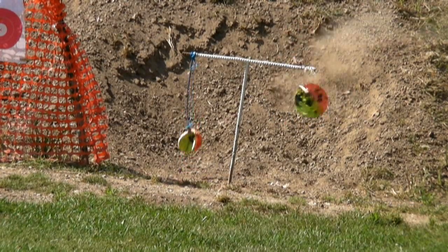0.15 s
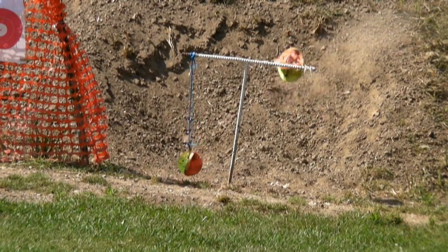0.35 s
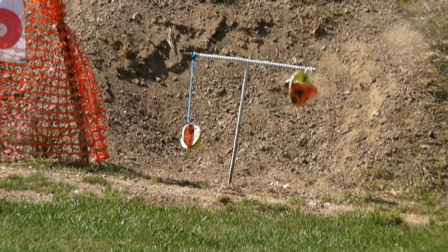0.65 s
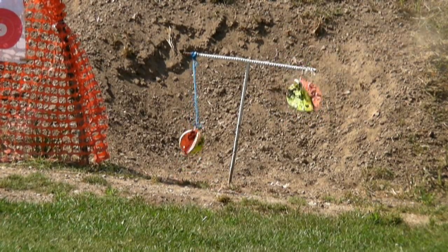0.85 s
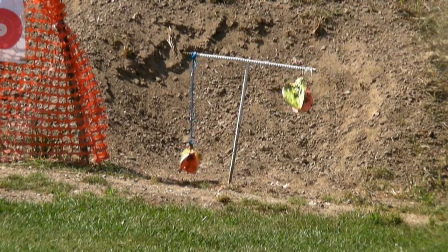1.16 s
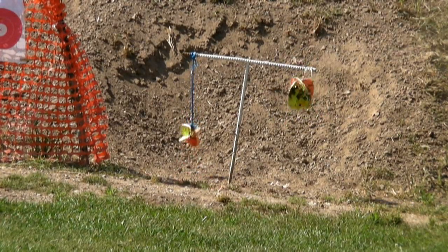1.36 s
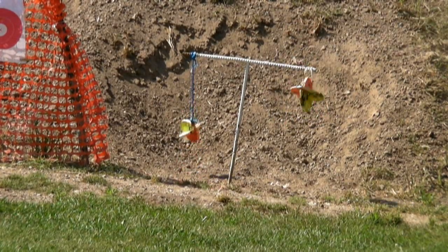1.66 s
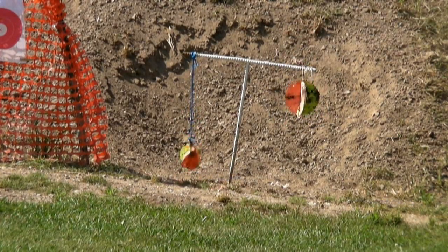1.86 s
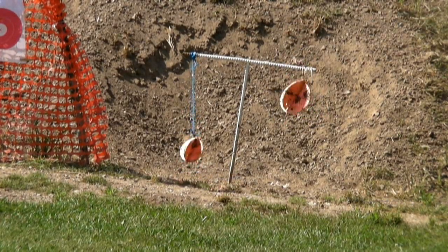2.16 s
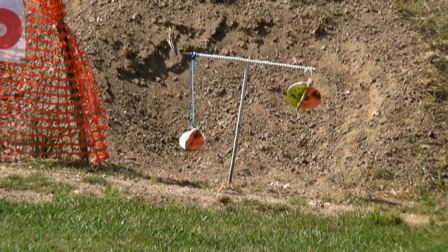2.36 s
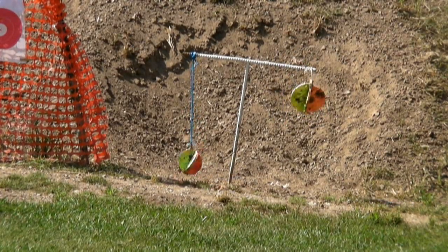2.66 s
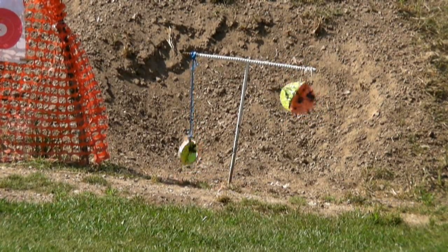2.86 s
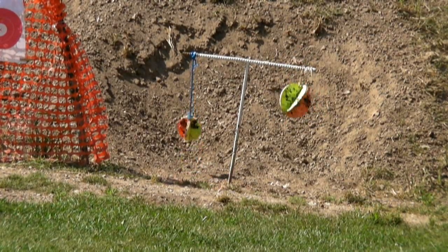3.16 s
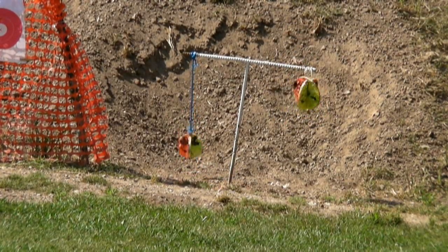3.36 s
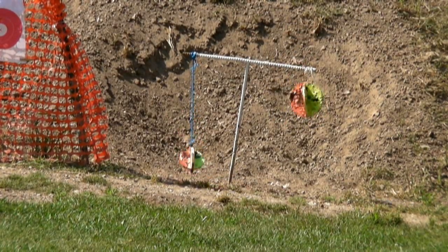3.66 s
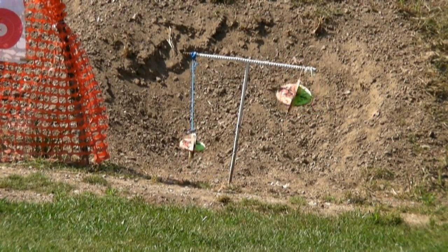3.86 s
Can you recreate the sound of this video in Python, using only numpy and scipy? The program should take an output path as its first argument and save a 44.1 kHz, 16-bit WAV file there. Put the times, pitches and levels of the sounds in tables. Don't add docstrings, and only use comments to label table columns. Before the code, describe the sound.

A rifle shot's grainy, hollow echo fades over the first half second outdoors. From 0.5 to 0.9 seconds a close steel lever clacks, grinds and rings open and shut, locking hard at 1.0. A brass case drops on the bench at 1.3, bounces, then faint knocks follow. Wind, distant traffic hum and fast high insect chirring slowly rise until a clipped, booming shot at 3.9.

```python
import sys
import numpy as np
from scipy import signal
from scipy.fft import rfft, irfft
from scipy.io import wavfile

SR = 44100
rng = np.random.default_rng(int(sys.argv[2]) if len(sys.argv) > 2 else 0)


def pcm_store(signal):
    levels = np.round(np.clip(np.atleast_2d(signal), -1, 1) * 32767)
    wavfile.write(sys.argv[1], SR, levels.astype(np.int16).T)


def voltage_ratio(level):
    return 10 ** (np.asarray(level, float) / 20)


N = 176400
SIDES = np.array([[1], [-1]])


def rms_one(x):
    return x / np.sqrt(np.mean(x ** 2) + 1e-20)


def in_time(rows):
    s, *columns = np.transpose(rows)
    return [np.interp(np.arange(N) / SR, s, c) for c in columns]


def at_hz(points, hz):
    points = np.array(points)
    return np.interp(np.log(hz), np.log(points[:, 0]), points[:, 1])


def drift(rate, size):
    r = np.exp(-80 * np.pi * rate / SR)
    white = rng.standard_normal(size // 40 + 2002)
    slow = signal.lfilter([1], [1, -2 * r, r * r], white)[2000:]
    return np.interp(np.arange(size) / 40, np.arange(len(slow)), rms_one(slow))


def bands(size, gain_db, width, wider_db=0.0, patchy_db=0.0, rate=20.0):
    out, together = 0, drift(rate / 3, size)
    edges = 24 * 2 ** np.arange(0, 9.6, .5)
    white = rng.standard_normal((2, 2, size + 4000))
    for k, (low, high) in enumerate(zip(edges, edges[1:])):
        sos = signal.butter(2, [low, high], "band", fs=SR, output="sos")
        mid, side = signal.sosfilt(sos, white[k % 2])[:, 4000:]
        hz = np.sqrt(low * high)
        side_gain = np.minimum(1, voltage_ratio(at_hz(width, hz) + wider_db))
        patches = patchy_db * (together + drift(rate, size))
        gain = voltage_ratio(gain_db(hz) + patches) / np.sqrt(1 + side_gain ** 2)
        out = out + gain * (mid + side_gain * side * SIDES)
    return out


# (frequency [Hz], side over mid [dB])
WIDE_IMAGE = [(60, -12.5), (150, -12), (500, -12), (1000, -14.5), (2000, -1.5), (8000, -11)]


def resonant_noise(hz, width_hz):
    sos = signal.butter(1, [hz - width_hz / 2, hz + width_hz / 2], "band", fs=SR, output="sos")
    mid, side = signal.sosfilt(np.vstack([sos, sos]), rng.standard_normal((2, N)))
    return rms_one(mid + voltage_ratio(at_hz(WIDE_IMAGE, hz)) * side * SIDES)


# (frequency [Hz], side over mid [dB])
NARROW_IMAGE = [(100, -22.5), (1000, -23.5), (4000, -14.5), (8000, -10.5), (12000, -1.5)]
# (time [s], level [dB], dulling by distance [0-1])
ECHO_RETURNS = [(0, -10.5, 0.67), (.022, -20.5, 0.13), (.072, -9.5, 0.4), (.1, -16, 0.31), (.18, -14, 0.56),
                (.3, -21, 0.59), (.5, -26, 0.7), (.95, -43.5, 0.67), (1.5, -59, 1)]
# (frequency [Hz], level [dB per Hz])
NEAR_COLOUR = [(50, -26.5), (380, -9), (900, -10.5), (1850, -0.5), (3300, -7.5), (4000, 2), (10400, -25),
               (15700, -56)]
FAR_COLOUR = [(29, -68), (50, -22), (269, -7), (469, 5.5), (596, -1), (672, 1), (758, 1.5), (1760, -8.5),
              (15700, -60.5)]


def echo():
    size = int(1.5 * SR)
    level_db, far = [c[:size] for c in in_time(ECHO_RETURNS)]
    late_db = -15 * np.exp(-(np.arange(size) / SR / 0.022) ** 2)

    def colour(hz):
        mix = (1 - far) * at_hz(NEAR_COLOUR, hz) + far * at_hz(FAR_COLOUR, hz)
        return mix + late_db * (hz < 1000)

    roar = voltage_ratio(level_db + 4) * rms_one(bands(size, colour, NARROW_IMAGE, patchy_db=0.87, rate=33.0))
    ridge_db, ridge_hz, ridge_width_hz = 0.5, 547, 114
    ridge = resonant_noise(ridge_hz, ridge_width_hz)[:, :size].mean(0)
    roar = roar + voltage_ratio(level_db + late_db + ridge_db) * np.clip(far, 0, 1) * ridge
    squashed = 1.14 * np.tanh(roar / 1.244)
    roar = signal.sosfilt(signal.butter(2, 7500, fs=SR, output="sos"), squashed)
    fade = np.minimum(1, np.arange(size)[::-1] / 4000)
    return np.pad(roar * fade, ((0, 0), (0, N - size)))


# (centre time [s], half width [s], level [dB])
HAND_SLIDES = [
    (.33, 0.01, -59),
    (0.366, 0.025, -34),
    (0.411, 0.0096, -50),
    (0.599, 0.033, -40),
    (3.5, 0.037, -50),
]


def hand():
    t = np.arange(N) / SR
    high_pass = signal.butter(2, 3000, "high", fs=SR, output="sos")
    rub = signal.sosfilt(high_pass, rng.standard_normal((2, N)))
    strokes = sum(voltage_ratio(db) * np.exp(-((t - s) / w) ** 2) for s, w, db in HAND_SLIDES)
    return rub * voltage_ratio(2 * drift(60.0, N)) * strokes


def blows(rows, spectrum, modes, t60, modes_db, rise, ring_t60, beat_hz=16.5, rattle_db=6):
    out, t = np.zeros((2, N + SR)), np.arange(SR // 3) / SR
    hz = np.maximum(np.arange(len(t) // 2 + 1) * SR / len(t), 20)
    mode_hz, mode_db, mode_t60 = np.transpose(modes)[:, :, None]
    mode_width = voltage_ratio(at_hz(NARROW_IMAGE, mode_hz))
    shake = drift(110, SR)
    for s, db, tilt, ring_hz, ring_db in rows:
        noise = rng.standard_normal((2, len(t)))
        chance = rng.standard_normal((2, len(modes), 1))
        rattle = rattle_db * np.array([np.roll(shake, int(c * SR))[:len(t)] for c in chance[0, :, 0]])

        shape = voltage_ratio(at_hz(spectrum, hz) + tilt * np.log2(np.maximum(hz, 500) / 3000))
        width = [np.ones_like(hz), voltage_ratio(at_hz(NARROW_IMAGE, hz))]
        mid, side = irfft(rfft(noise) * shape * width, len(t))
        crack = rms_one(mid + side * SIDES) * voltage_ratio(-60 * np.maximum(t - rise, 0) / t60 - 7.0)

        ring_level = voltage_ratio(ring_db + .5 * rattle[0] * (ring_hz < 6000) - 60 * t / ring_t60)
        ring_skew = SIDES * voltage_ratio(at_hz(NARROW_IMAGE, ring_hz))
        ring = ring_level * np.sin(2 * np.pi * ring_hz * t + ring_skew) * np.cos(np.pi * beat_hz * t)

        body = voltage_ratio(modes_db + mode_db + 2 * chance[0] + rattle - 60 * t / mode_t60)
        skew = SIDES[:, None] * mode_width * chance[1]
        body = np.sum(body * np.sin(2 * np.pi * mode_hz * t + skew), axis=1)
        i = int(s * SR)
        out[:, i:i + len(t)] += voltage_ratio(db) * (crack + ring + body) * np.minimum(1, t / rise)
    return out[:, :N]


# (time [s], peak level [dB], tilt [dB per octave], ring [Hz], ring level [dB])
OPENING_CLACKS = [
    (0.5063, -12.5, 6, 10320, 6.5),
    (0.579, -10.5, 3, 5860, -18.5),
    (0.6283, -5, -1, 4320, -11),
    (0.6384, -9, 5, 3970, -6.5),
    (0.6484, 5, -0.2, 4117, -18),
    (0.7465, -18, -1, 12300, -13),
]
SHUTTING_CLACKS = [
    (0.7904, -12.5, -2.1, 10370, -13),
    (0.825, -2.5, -0.3, 12370, -6),
    (0.8599, -11, -0.37, 3830, -17.5),
    (.8692, -5.5, 0.61, 6680, -19),
    (.8982, -0.5, 1.2, 11980, -22.5),
    (0.8804, 2, -0.15, 5650, -16),
]
STEEL_GRINDS = [
    (.514, -1.5, 0, 7550, -4),
    (.805, -10.5, -3, 12300, -10),
    (.829, -9.5, -1.5, 12470, 2.5),
    (.844, -10.5, 0, 4040, -11),
    (.872, -20, -8.5, 6680, -18.5),
    (.886, 0.5, 1.5, 5620, -19),
    (.815, -11, -5, 2300, -18),
    (.919, -39, 5, 3920, -19.5),
]
SPRING_TICKS = [(.501, -24, 1.5, 7950, -18), (.5065, -21, -3, 12900, 8), (.5766, -3, 5, 11600, -19),
                (.612, -34, 1, 12800, -9.5), (.6495, -10, -3, 15500, 6), (.652, -17, -4, 14100, 9),
                (.8055, -13, -1, 12100, -4), (.8788, -9, 10, 6890, -20.5), (1.3364, -22, 5, 8600, -11),
                (.8975, -12.5, 0.5, 11920, 6), (.5145, -21, 0, 10350, 14)]
LOCK_BLOWS = [
    (1.002, -16, 4, 4000, -6.5),
    (1.0068, 9, 1, 4183, -11),
]
# (frequency [Hz], level [dB])
STEEL_COLOUR = [(120, -36), (250, -34), (600, -11), (1960, -1), (4070, -3), (4900, -6.5), (6200, -4.5),
                (15700, -15.5)]
# (frequency [Hz], level [dB], T60 [s])
OPEN_MODES = [(128, -25, 0.022), (584, -9, 0.1), (635, -10, 0.15), (1185, -4.5, 0.14), (2970, 3, 0.08),
              (3700, -1, 0.025), (6400, -16, 0.13), (6672, -8.5, 0.13), (8600, -8, 0.13), (10100, -8, 0.14),
              (12500, -11.5, 0.19), (13200, -14.5, 0.21), (16000, 4.5, .12)]
CLOSED_MODES = [(125, -12.5, 0.047), (583, -9.5, 0.14), (641, -9.5, 0.11), (703, -9, 0.101),
                (2470, -9, .08), (2825, -8.5, 0.1), (3580, -0.5, 0.059), (3810, -5.5, 0.058),
                (6400, -12, 0.14), (6540, -11.5, 0.19), (9050, -8, 0.11), (12170, -16, .1),
                (13000, -16, .1), (15610, -5, 0.118)]


def lever():
    steel_t60, ring_t60, open_db, hit_rise = 0.05, 0.063, -35, 0.00076
    clacks = list(OPENING_CLACKS) + list(SHUTTING_CLACKS)
    out = blows(clacks, STEEL_COLOUR, OPEN_MODES, steel_t60, open_db, hit_rise, ring_t60)
    out = out + blows(STEEL_GRINDS, STEEL_COLOUR, OPEN_MODES, steel_t60, open_db, 0.0059, ring_t60)
    out = out + blows(SPRING_TICKS, STEEL_COLOUR, OPEN_MODES, 0.0065, open_db, 0.00032, 0.028, beat_hz=3.7)
    return out + blows(LOCK_BLOWS, STEEL_COLOUR, CLOSED_MODES, steel_t60, -15.5, hit_rise, 0.068,
                       rattle_db=4.5)


# (time [s], peak level [dB], tilt [dB per octave], ring [Hz], ring level [dB])
BRASS_BOUNCES = [
    (1.3366, -5.5, -1.9, 6740, -27.5),
    (1.415, -19, -3.5, 6675, -43),
    (1.4256, -13.5, -0.5, 6675, -47),
    (1.467, -24.5, -3, 6675, -45),
    (1.742, -35, -9, 6675, -44),
    (2.004, -28.5, 0, 6675, -56),
    (2.364, -39.5, 4, 6675, -44),
    (2.95, -50, -9, 6740, -47),
    (3.505, -35, 3, 6675, -47),
    (3.245, -41, -2, 6675, -45),
]
BRASS_TOUCHES = [
    (1.4249, -13, 2, 4100, -12),
    (1.4154, -23, 1.5, 3300, -10),
    (1.7435, -35, 2, 2100, -9),
    (2.0046, -29, 2, 2100, -5),
    (2.951, -36, 2.5, 2500, -10),
]
# (frequency [Hz], level [dB])
BENCH_COLOUR = [(90, -42), (200, -12.5), (700, -5), (1770, 1.5), (2900, -4), (3500, -13), (6200, -24),
                (14000, -35.5)]
# (frequency [Hz], level [dB], T60 [s])
CASE_MODES = [(403, -13.5, 0.1), (732, -6, 0.11), (1670, 4, 0.022), (2100, 2.5, 0.064), (2550, -8, 0.091),
              (1570, -14, 0.13), (1083, -6, 0.1)]


def spent_case():
    case_db = -17.5
    touches = blows(BRASS_TOUCHES, BENCH_COLOUR, CASE_MODES, 0.0065, case_db, 0.00032, .02)
    return touches + blows(BRASS_BOUNCES, BENCH_COLOUR, CASE_MODES, 0.059, case_db, 0.00076, 0.29, beat_hz=10.6)


# (frequency [Hz], T60 [s])
SHELTER_DECAY = [(300, 0.61), (2000, 0.29), (8000, 0.3), (15000, 0.26)]


def shelter(x):
    t = np.arange(SR // 2) / SR
    tail = bands(len(t), lambda hz: -60 * t / at_hz(SHELTER_DECAY, hz), NARROW_IMAGE, wider_db=1.0)
    tail = tail * np.minimum(1, t / 0.011)
    tail = tail / np.sqrt(np.sum(tail[0] ** 2))
    return voltage_ratio(-9.5) * signal.fftconvolve(x.mean(0)[None], tail, axes=1)[:, :N]


# (frequency [Hz], level [dB per Hz])
AIR_COLOUR = [(15, -37), (25, -4), (107, -3.5), (391, -15), (810, -15.5), (7010, -34), (8460, -35),
              (9680, -39.5), (15700, -53)]


def wind_and_traffic():
    return rms_one(bands(N, lambda hz: at_hz(AIR_COLOUR, hz), WIDE_IMAGE, patchy_db=1.42, rate=32.0))


def engine_drone():
    return voltage_ratio(-8 + 3.3 * drift(5.9, N)) * resonant_noise(111.5, 11)


def insect():
    since = np.arange(N) / SR - 3.301
    turn = (since * 17.45 + .25) % 1 - .25
    second = voltage_ratio(-5) * np.exp(-((turn - .42) / .09) ** 2)
    pulses = .3 + np.exp(-(turn / .11) ** 2) + second
    level = voltage_ratio(-14 + 2 * since + 1.5 * drift(7.5, N))
    song_hz, fall_hz = 8580, 120
    pitch = song_hz - fall_hz * np.tanh(6 * turn) * (turn < .25) + 40 * drift(30.0, N)
    note = np.sin(2 * np.pi * np.cumsum(pitch) / SR)
    rasp = (.45 + .3 * pulses) * resonant_noise(song_hz, 800)
    return level * (rasp + voltage_ratio(5) * (pulses - .2) * note)


# (time [s], level [dB])
GAIN_CREEP = [(1.25, -48), (1.76, -46), (3.86, -40.5)]


def field():
    far_insect = voltage_ratio(-25) * resonant_noise(4150, 300)
    bed = wind_and_traffic() + engine_drone() + insect() + far_insect
    return voltage_ratio(in_time(GAIN_CREEP)[0]) * bed + voltage_ratio(-55) * rng.standard_normal((2, N))


# (frequency [Hz], level [dB per Hz])
CRACK_COLOUR = [(35, -34), (200, -5), (1130, -4), (1390, -3.5), (1800, -4), (3150, -8.5), (6960, -1),
                (15700, -11.5)]
BOOM_COLOUR = [(30, -33), (60, -19), (100, -8), (525, -1), (1290, -4), (2300, -4.5), (3880, -9.5),
               (15700, -33.5)]


def shot():
    t = np.arange(N) / SR
    jolt_s, gas_s = 3.8813, 3.8912
    since = np.maximum(t - jolt_s, 0)
    balance = np.array([np.ones(N), voltage_ratio(-10) * (since < .0042)])
    thump = np.sin(2 * np.pi * 480 * since)
    knock = 0.42 * np.exp(-since / .004) * np.sin(2 * np.pi * 1600 * since)
    jolt = voltage_ratio(2) * balance * np.minimum(1, since / .003) ** 2 * (thump + knock)
    jolt = jolt * voltage_ratio(-60 * np.maximum(t - gas_s, 0) / 0.014)
    after = t[int(gas_s * SR):] - gas_s
    crack = rms_one(bands(len(after), lambda hz: at_hz(CRACK_COLOUR, hz), WIDE_IMAGE, wider_db=11.0))
    crack = crack * voltage_ratio(18.5 - 60 * after / 0.15)
    boom = rms_one(bands(len(after), lambda hz: at_hz(BOOM_COLOUR, hz), WIDE_IMAGE, wider_db=-0.5))
    boom = boom * voltage_ratio(8.5) * np.clip(after / 0.11, 0, 1)
    return jolt + np.pad(crack + boom, ((0, 0), (N - len(after), 0)))


def scene():
    near = lever() + spent_case()
    return echo() + hand() + near + shelter(near) + field() + shot()


def low_pass(x):
    return signal.sosfilt(signal.butter(12, 15880, fs=SR, output="sos"), x)


def record(dry):
    top_limit = signal.cheby2(10, 50, 15900 + 500, fs=SR, output="sos")
    overloaded = np.clip(signal.sosfilt(top_limit, dry), -1.0, 1.0)
    notch_hz, notch_width_hz = 7850, 150
    mix = signal.lfilter(*signal.iirnotch(notch_hz, notch_hz / notch_width_hz, fs=SR), overloaded)
    return low_pass(mix)


dry = scene()
out = record(dry)
pcm_store(out)
```